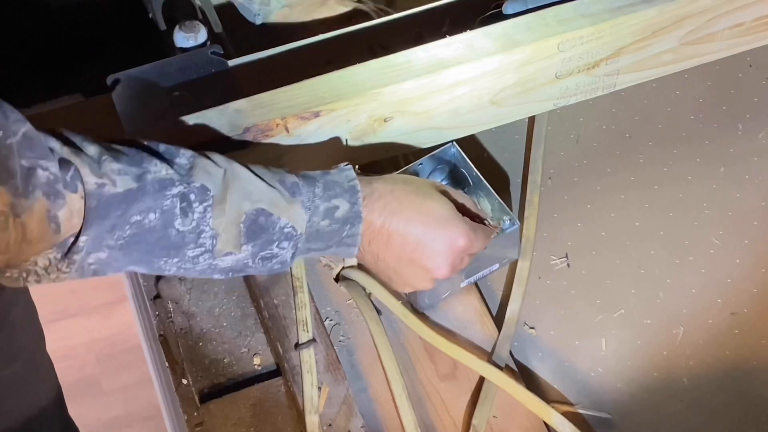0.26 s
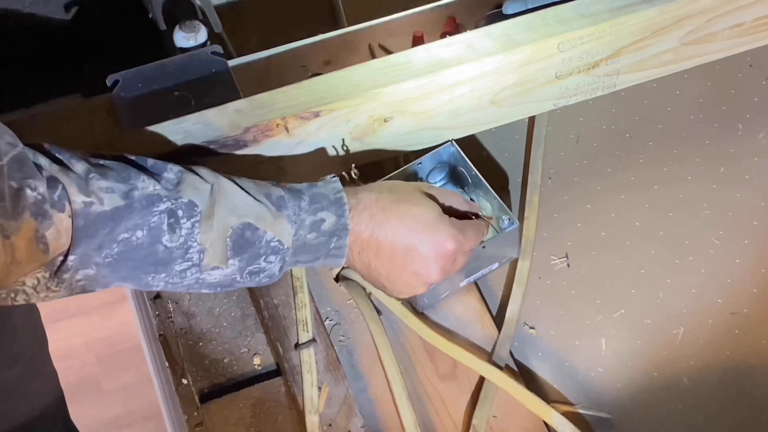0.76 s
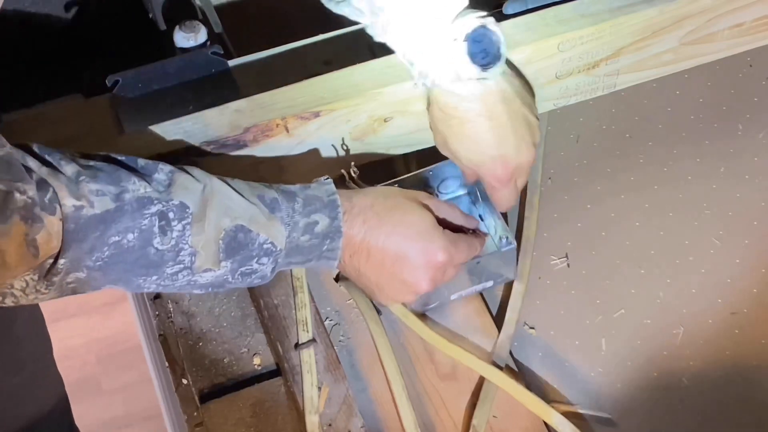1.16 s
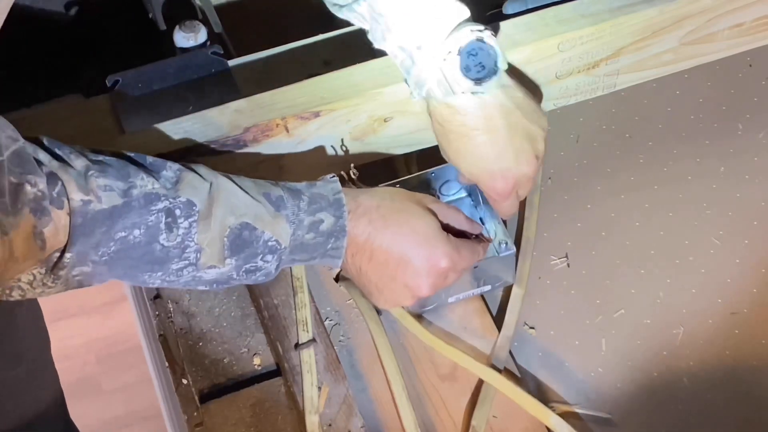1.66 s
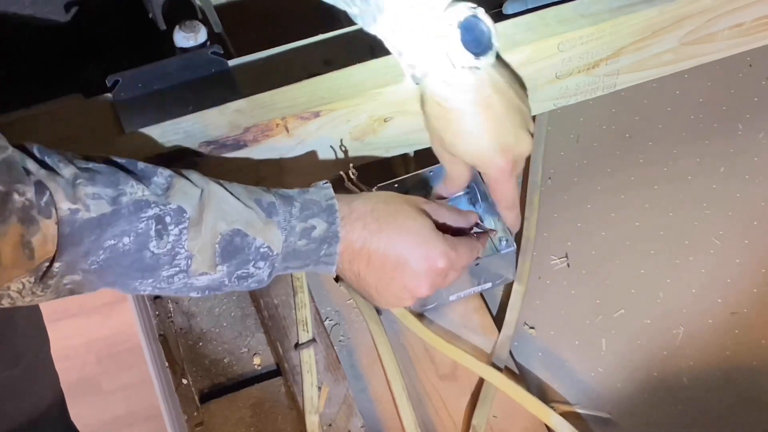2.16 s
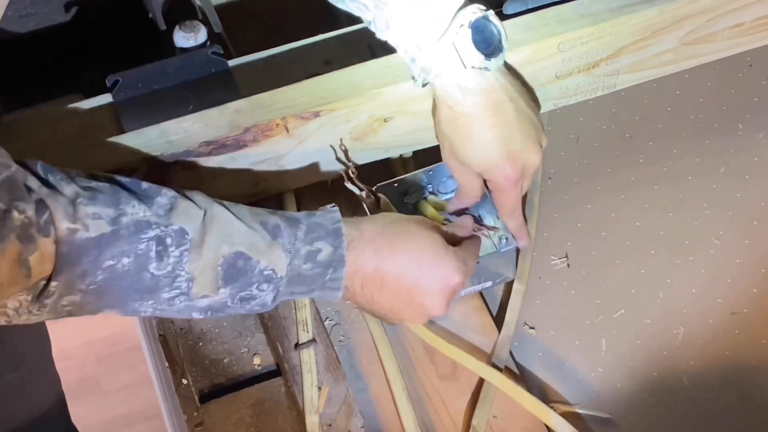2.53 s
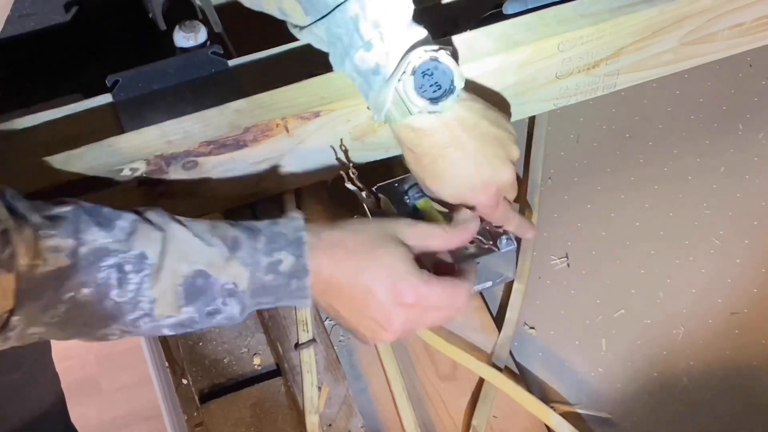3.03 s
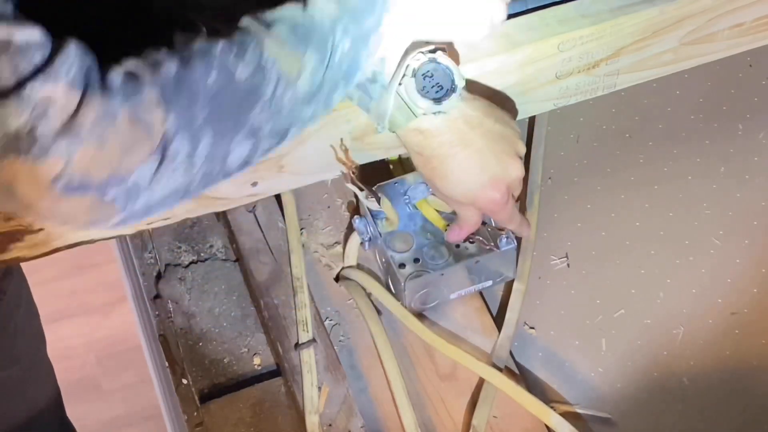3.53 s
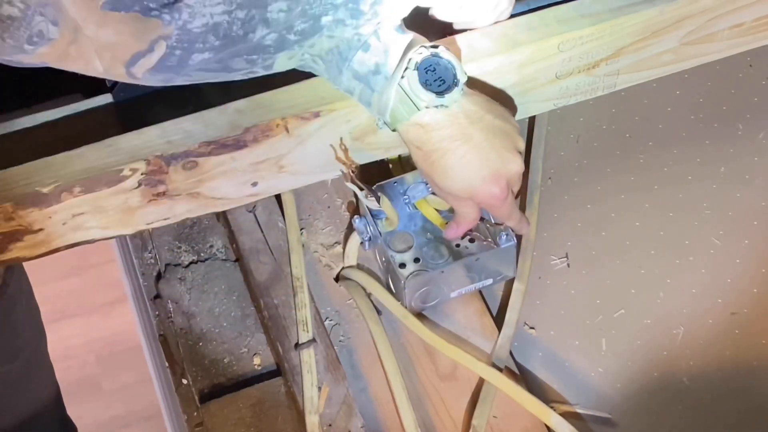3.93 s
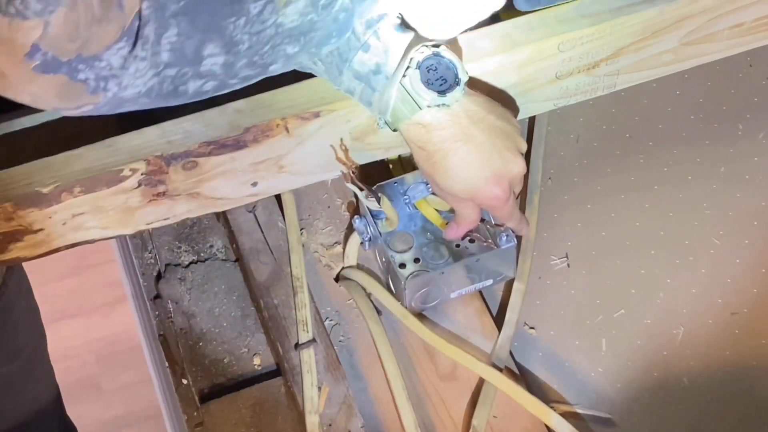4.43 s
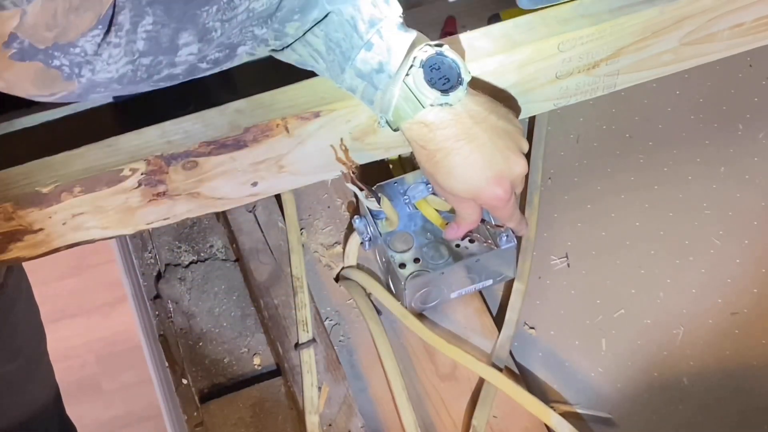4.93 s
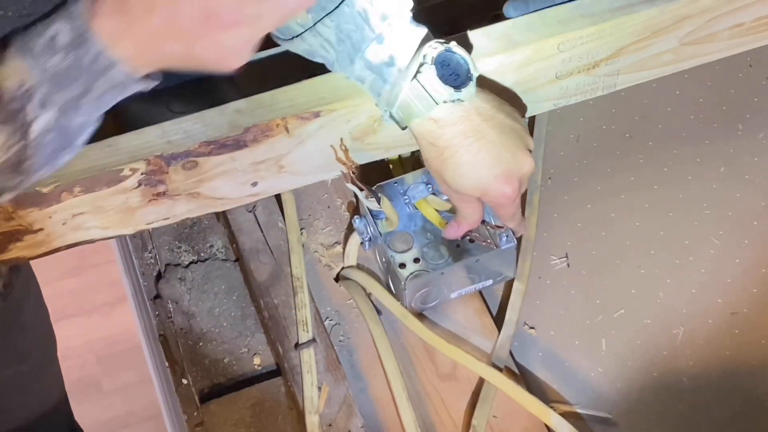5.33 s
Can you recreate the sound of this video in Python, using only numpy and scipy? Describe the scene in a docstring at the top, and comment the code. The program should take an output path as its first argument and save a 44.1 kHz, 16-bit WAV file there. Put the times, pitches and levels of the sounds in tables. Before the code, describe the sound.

Stiff sheathed cables are worked by hand in a steel electrical box, giving quiet rubs, scrapes and small metallic ticks, with a few soft thumps on a wooden board. Past the middle, a tool shifted on the boards makes louder clunks and a sharp click over hollow thuds, then a second cluster of knocks. Light ticks follow. The microphone is close, in a quiet attic.

```python
"""Stiff cables worked by hand in a steel box on an attic board; then a tool shifted on the boards.
Sheath rubs in dense slips and ticks on steel; strokes and blows ring the box modes briefly.
Soft knocks boom the board's bending mode, weight makes it rumble. Below lie room air and a sinking
hum; a faint thin tone comes and goes. A timing ripple mirrors the bass faintly around SR / 4."""
import sys
import numpy as np
from scipy import signal
from scipy.fft import rfft, irfft, next_fast_len
from scipy.io import wavfile

SR = 44100
rng = np.random.default_rng(int(sys.argv[2]) if len(sys.argv) > 2 else 0)


def unload_wav(signal):
    """Save mono or channel-first audio to the path in sys.argv[1] as 16-bit WAV at rate SR, clipped to [-1, 1]."""
    wavfile.write(
        sys.argv[1],
        SR,
        np.round(np.clip(np.atleast_2d(signal).T, -1, 1) * 32767).astype(np.int16),
    )


N = 246078

# soft knocks on the board: t/s, peak/dB, f/Hz, t60/s
KNOCKS = [(0.786, -26, 131.7, 0.2), (0.814, -26, 137.9, 0.1), (1.301, -47.5, 140.7, 0.19),
          (1.463, -31.5, 125.9, 0.082), (1.638, -35.5, 130.7, 0.16), (1.667, -44.5, 115, 0.092),
          (2.239, -47.5, 136.4, 0.36), (3.392, -42, 158, .21), (3.47, -39.5, 155, 0.29),
          (3.54, -43.5, 149.9, 0.28), (3.578, -35.5, 129.6, 0.088), (3.607, -28, 130.6, 0.17),
          (3.688, -34.5, 157.6, 0.28), (3.79, -20, 165.2, 0.27), (3.828, -20.5, 163.6, 0.097),
          (3.919, -38.5, 139.8, 0.2), (3.993, -27, 155.5, 0.28), (4.018, -23, 159.1, 0.15),
          (4.084, -36, 162.4, 0.13), (4.281, -29.5, 151.1, 0.071), (4.318, -25, 136.2, 0.12),
          (4.375, -33, 152.6, 0.28), (4.499, -35.5, 155.6, 0.37), (4.636, -28.5, 154.6, .21),
          (4.676, -28.5, 146.9, 0.58), (4.727, -23.5, 156.6, 0.16), (4.81, -42.5, 152.6, 0.23)]


def amp(db):
    """dB to gain."""
    return 10 ** (np.asarray(db) / 20)


def rms_one(x):
    """Scale to unit rms."""
    return x / np.sqrt(np.mean(x ** 2) + 1e-20)


def in_time(rows):
    """Columns after t/s as per-sample curves."""
    s, *columns = np.transpose(rows)
    return [np.interp(np.arange(N) / SR, s, c) for c in columns]


def at_hz(points, hz):
    """Read a spectrum on a log axis."""
    points_hz, db = np.transpose(points)
    return np.interp(np.log(hz), np.log(points_hz), db)


def band(x, low_hz, high_hz, order=2):
    """Butterworth band-pass."""
    return signal.sosfilt(signal.butter(order, [low_hz, high_hz], "band", fs=SR, output="sos"), x)


def noise(grain=0.):
    """Unit-rms noise; grain spreads the sample sizes, as slips of a rub do."""
    return rms_one(amp(grain * np.minimum(rng.exponential(1, N), 5)) * rng.standard_normal(N))


def drift(rate_hz):
    """Slow random curve, rms 1."""
    r = np.exp(-80 * np.pi * rate_hz / SR)
    slow = signal.lfilter([1], [1, -2 * r, r * r], rng.standard_normal(N // 40 + 2002))[2000:]
    return np.interp(np.arange(N) / 40, np.arange(len(slow)), rms_one(slow))


def resonate(x, hz, width_hz):
    """One resonance, peak gain 1."""
    r = np.exp(-np.pi * width_hz / SR)
    feedback = [1, -2 * r * np.cos(2 * np.pi * hz / SR), r * r]
    return signal.lfilter(np.array([1, 0, -1]) * (1 - r * r) / 2, feedback, x)


def body(x, modes, wander_db):
    """Parallel modes, alternating signs; the grip moves, so each swells and fades by itself."""
    return sum((-1) ** k * resonate(amp(db + wander_db * drift(4.8)) * x, hz, width_hz)
               for k, (hz, width_hz, db) in enumerate(modes))


def coloured(spectrum, flicker_db, grain=0.):
    """Half-octave noise bands, each with its own level and flicker; rms 1."""
    out, edges_hz = 0, 25 * 2 ** np.arange(0, 9.6, .5)
    white = [noise(grain), noise(grain)]
    for k, (low, high) in enumerate(zip(edges_hz, edges_hz[1:])):
        db = at_hz(spectrum, np.sqrt(low * high)) + flicker_db * drift(11.4)
        out = out + amp(db) * band(white[k % 2], low, high)
    return rms_one(out)


def decay(size, t60_s):
    """Exponential fall, 60 dB in t60_s."""
    return amp(-60 * np.arange(size) / SR / t60_s)


def ringing(hz, db, t60_s, size):
    """One struck mode dying away."""
    return amp(db) * decay(size, t60_s) * np.sin(2 * np.pi * hz * np.arange(size) / SR)


def stroke_db(full_s, rise_s, hold_s):
    """Climb to 0 dB, hold, release."""
    climb_db, release_db_per_s = 28, 210
    t = np.arange(N) / SR - full_s
    return np.minimum(0, np.minimum(climb_db * t / rise_s, release_db_per_s * (hold_s - t)))


def handling():
    """Strokes of cable and hand add in power; the loudest dominates the rub's brightness."""
    # strokes: full at t/s, rise/s, hold/s, rub/dB, brightness/dB, low box modes/dB, high box modes/dB
    strokes = [(0.0, 0.013, 0.096, -66, 4, -57.5, -60), (0.158, 0.1, 0.083, -66, 5, -59, -60.5),
               (0.668, 0.042, .0, -66.5, 3.5, -53, -80), (0.693, .02, 0.1, -76, 3, -54.5, -81),
               (0.969, 0.072, .03, -61, 3, -63.5, -76.5), (1.03, .04, 0.02, -58, 0.5, -55.5, -61),
               (1.206, .05, 0.34, -77, -3.5, -65.5, -66), (1.439, 0.024, 0.046, -76, 5, -68, -67),
               (1.538, 0.027, .0, -62, -1, -61, -55), (1.624, 0.1, 0.042, -68, 1, -60.5, -57.5),
               (1.788, 0.053, .0, -65.5, -13, -82, -57), (2.102, 0.15, 0.083, -72, 3.5, -64.5, -53.5),
               (2.251, 0.035, 0.029, -70, 2, -56.5, -60), (2.455, 0.042, 0.058, -69.5, 5, -57.5, -62),
               (2.726, 0.029, 0.065, -67, -1, -58.5, -67), (2.823, .03, 0, -58.5, 6.5, -63, -61),
               (3.303, 0.11, 0.051, -71.5, 2.5, -69, -63), (3.35, 0.017, 0.057, -72.5, 4.5, -64, -66.5),
               (3.451, 0.016, 0.05, -70, -2, -54.5, -63.5), (3.57, 0.11, 0.2, -75.5, 2.5, -62, -65.5),
               (3.676, 0.012, 0.032, -60, -10.5, -36.5, -36.5), (3.727, 0.085, 0.018, -52, 3.5, -36.5, -28),
               (3.788, 0.0045, 0.027, -53, 3, -28, -52), (3.879, 0.043, 0.091, -74.5, 7.5, -47, -62.5),
               (4.011, .03, 0.1, -82.5, 7.5, -61, -84), (4.283, 0.014, 0, -90, -7, -34.5, -82),
               (4.519, 0.092, 0.000079, -63, 2.5, -51, -48.5), (4.641, 0.039, 0.052, -74, 8, -48.5, -57),
               (4.953, 0.016, 0.058, -59, 7, -64, -56.5), (5.1, 0.0053, 0.047, -66, 5, -87, -71),
               (5.215, 0.03, .1, -77, 7.5, -84, -69), (5.58, 0.045, .0, -83, 3, -55.5, -67)]
    rest_db = np.array([[-89], [-70.5], [-77.5]])   # between strokes: rub, low, high
    power, tilt = amp(rest_db) ** 2 * np.ones(N), np.zeros(N)
    for s, rise_s, hold_s, rub_db, bright_db, low_db, high_db in strokes:
        shape_db = np.maximum(stroke_db(s, rise_s, hold_s), -200)
        part = amp(np.array([[rub_db], [low_db], [high_db]]) + shape_db) ** 2
        power += part
        tilt += bright_db * part[0]
    rub_db, low_db, high_db = 10 * np.log10(power)
    return rub_db, tilt / power[0], low_db, high_db


def box(low_db, high_db, blow):
    """Handling and blows drive the low and high box modes."""
    # modes of the box and the boards under it: f/Hz, width/Hz, level/dB
    modes = [(246.5, 19, -4), (323, 23, 3), (379.6, 18.5, 1), (432, 11, 5.5), (464.6, 25.4, 4.5),
             (557.4, 6.7, -5.5), (595, 8.8, -7), (689, 48, -5), (775.5, 9, -5), (820.3, 10, -1.5),
             (915, 57, -10.5), (1020, 36, -9), (1166, 30, -19)]
    split_hz = 650
    low = (amp(low_db) + blow) * noise(grain=2.0)
    high = (amp(high_db) + blow) * noise(grain=1.9)
    ring = body(low, [m for m in modes if m[0] < split_hz], wander_db=2.5)
    ring += body(high, [m for m in modes if m[0] >= split_hz], wander_db=3.5)
    weak_modes = amp(11) * band(low, 180, 486) + amp(-8) * band(high, 640, 830)
    clunk = amp(9) * band(blow * noise(), 430, 980, order=4)
    return amp(15.5) * ring + weak_modes + clunk


def rub(level_db, bright_db, steel_db):
    """Sheath and sleeve slide in dense slips, brightness set per stroke; scraping wakes the steel."""
    # sliding spectrum: f/Hz, density/dB
    spectrum = [(530, -30), (900, -5), (1200, -5), (1490, 2), (1970, -3), (2140, 3.5), (3300, -4.5),
                (6640, -14.5), (9420, -14), (14900, -32.5), (16000, 18)]
    # modes of steel walls and clamp: f/Hz, width/Hz, level/dB
    steel_modes = [(1440, 18, 2.5), (1927, 23, 3), (2132, 20, 2), (2420, 38, -16.5), (2560, 29, -8.5),
                   (2890, 47, -16), (3900, 310, -13.5)]
    swish = amp(level_db + drift(34)) * coloured(spectrum, flicker_db=3.5, grain=0.74)
    top = band(swish, 3500, 8100)
    steel = body(amp(steel_db) * noise(grain=5.9), steel_modes, wander_db=-0.5)
    return swish + (amp(bright_db) - 1) * top + steel


def weight_on_boards():
    """Envelope of the rumble from shifting weight."""
    # load on the boards: t/s, rumble/dB
    load = [(0.0, -59), (0.5, -70.5), (0.82, -56), (1.2, -72), (1.68, -63), (1.89, -78), (2.17, -75),
            (2.36, -62.5), (2.81, -75), (3.26, -68), (3.85, -45.5), (3.95, -49.5), (4.1, -68), (4.38, -74),
            (4.54, -52), (4.71, -49), (5.05, -72), (5.58, -73)]
    return amp(in_time(load)[0])


def rumble(weight, after_shake):
    """The boards rumble under weight and after knocks."""
    return np.hypot(weight, amp(-19) * after_shake) * rms_one(band(noise(), 50.5, 93.8, order=4))


def board(swing, weight, after_shake):
    """One bending mode, swung by knocks, gliding between their pitches, shaken in between."""
    pitch_hz = in_time(KNOCKS)[1] * (1 + .02 * drift(15))
    phase = 2 * np.pi * np.cumsum(pitch_hz) / SR
    boom = swing * (np.sin(phase) + amp(-16.5) * np.sin(2.08 * phase))
    shaking = np.hypot(amp(-7) * weight, amp(-13.5) * after_shake)
    mode_noise = resonate(resonate(noise(), 139.6, width_hz=45), 140, width_hz=130)
    return boom + shaking * rms_one(mode_noise)


def room_air():
    """Faint flickering noise, mostly bass."""
    # room spectrum: f/Hz, density/dB
    spectrum = [(15, -34), (25, 2.5), (74, 4.5), (137, 1.5), (301, -11), (463, -19), (607, -17), (911, -35),
                (1400, -40.5), (1790, -54.5), (8830, -47.5), (11000, -56), (16000, -66.5)]
    return amp(-58.5) * coloured(spectrum, flicker_db=4.5)


def hum():
    """A wavering low tone sinks and dies."""
    # glide of the hum: t/s, f/Hz, rms/dB
    glide = [(0.0, 72.9, -57.5), (.4, 69.96, -52.5), (.9, 63.27, -59.5), (1.5, 60.5, -52), (1.8, 56, -66)]
    hz, db = in_time(glide)
    fade_db = 80 * np.maximum(np.arange(N) / SR - glide[-1][0], 0)
    level = np.sqrt(2) * amp(db + 2 * drift(8) - fade_db)
    phase = 2 * np.pi * np.cumsum(hz * (1 + .02 * drift(6.9))) / SR
    return level * np.sin(phase)


def contacts():
    """Hard contacts tick and ring the wires. Returns their sound and the envelope of blows on the box."""
    # contacts: t/s, level/dB, box blow/dB, brightness/dB, wire f/Hz
    hits = [(.0211, -42, -84, -29, 3400), (.1538, -45.5, -46, -12, 2340), (.5815, -53.5, -59, -16, 3800),
            (.6632, -41, -56, -12, 2320), (.7902, -79.5, -47, -17, 2190), (.868, -59, -81, -8, 1970),
            (0.9604, -42.5, -49.5, -26, 3170), (1.4509, -45, -49, -19, 2250),
            (1.533, -41.5, -55.5, -11, 2770), (1.7434, -48.5, -58, -27, 3540),
            (1.7765, -43, -43.5, -13, 2820), (1.9871, -62.5, -51.5, -9, 2060),
            (2.069, -58, -47.5, -11, 2000), (2.0873, -44, -70, -19, 2050), (2.2025, -42.5, -67, -15, 4350),
            (2.2383, -42.5, -45, -20, 2150), (2.4494, -50, -55.5, -21, 3400), (2.4714, -49, -73, -28, 3550),
            (2.7186, -36.5, -61, -22, 2070), (2.814, -37, -71, -25, 3390), (3.3587, -49, -45, -23, 1960),
            (3.463, -52, -41.5, -18, 2020), (3.5435, -81, -41.5, -19, 1910),
            (3.6682, -28.5, -29, -16.5, 2520), (3.769, -37.5, -24, -5, 1939),
            (3.79, -17.5, -17, -13.5, 3740), (3.9902, -65.5, -38, -23, 2830),
            (4.0447, -49.5, -67, -36, 1950), (4.282, -66, -34, -3, 1900), (4.4792, -50, -55, -20, 2550),
            (4.5034, -52, -64, -15, 2380), (4.6422, -54, -46, -9, 3528),
            (4.6631, -30.5, -31.5, -16.5, 2490), (4.7083, -43, -36.5, -16, 4300),
            (4.887, -61, -69, -23, 2768), (4.9545, -37.5, -59, -41, 6490), (5.1119, -41, -69, -29, 4560),
            (5.212, -59, -72, -25, 4400), (5.24, -59, -73, -31, 2020), (5.3847, -52.5, -81, -23, 1790)]
    dull, bright, blow, rings = np.zeros((4, N + SR))
    size = SR // 2
    onset = np.minimum(np.arange(size) / (0.001 * SR), 1)   # sheath cushions the touch
    shape = onset * (decay(size, 0.0086) + amp(-14.5) * decay(size, 0.14))   # crack, then chatter
    for s, db, box_db, bright_db, hz in hits:
        i = round(s * SR)
        dull[i:i + size] += amp(db) * shape
        bright[i:i + size] += amp(db + bright_db) * shape
        blow[i:i + size] += amp(box_db) * (decay(size, 0.0041) + amp(-7.5) * decay(size, 0.07))
        rings[i:i + size] += ringing(hz, db - 16, 0.041, size)
    ticks = amp(-2.5) * band(dull[:N] * noise(grain=3.2), 1700, 6000)
    ticks += band(bright[:N] * noise(grain=1.8), 4500, 21000)
    return ticks + rings[:N], blow[:N]


def thin_tone():
    """Faint narrow-band noise comes and goes."""
    # swells of the tone: full at t/s, rise/s, hold/s, level/dB
    swells = [(.36, .05, 0.11, -83.5), (5.31, 0.039, 0.012, -76.5), (5.53, 0.09, 0.018, -79)]
    level = sum(amp(db + stroke_db(s, rise_s, hold_s)) for s, rise_s, hold_s, db in swells)
    return level * rms_one(resonate(noise(), hz=1770, width_hz=59))


def knocks():
    """Envelopes of the board's swing and its slower after-shake; knocks add in power."""
    rise_s, after_t60_s = 0.017, 0.62
    swing, after = np.zeros((2, N + SR))
    t = np.arange(SR) / SR
    swell = np.sin(np.pi / 2 * np.minimum(t / rise_s, 1)) ** 2
    for s, db, _, t60_s in KNOCKS:
        i = round(s * SR)
        swing[i:i + SR] += (amp(db - 60 * np.maximum(t - rise_s, 0) / t60_s) * swell) ** 2
        after[i:i + SR] += (amp(db) * swell * decay(SR, after_t60_s)) ** 2
    return np.sqrt(swing[:N]), np.sqrt(after[:N])


def clink(at_s):
    """A loose steel part rings once."""
    # modes of the part: f/Hz, level/dB, t60/s
    modes = [(1400, -56.5, 0.1), (2640, -62, 0.11), (4302, -60, 0.088), (2100, -79, .06), (5760, -81, .12),
             (5530, -65, 0.14), (7900, -59, .06), (8300, -68, .06)]
    i = round(at_s * SR)
    ring = sum(ringing(hz, db, t60_s, N - i) for hz, db, t60_s in modes)
    return np.pad(ring, (i, 0))


def stereo_ports(mid):
    """Two close ports: the side signal is a quarter turn in the bass, scattered reflections higher up."""
    # stereo width: f/Hz, side re mid/dB
    width = [(60, -32.5), (110, -13), (200, -10.5), (380, -8), (700, -6), (1290, -1.5), (2380, -11),
             (4400, -44.5), (8120, -6), (15000, -16.5)]
    size = next_fast_len(N + SR // 10)
    hz = np.maximum(np.arange(size // 2 + 1) * SR / size, 1)
    reflections = rms_one(decay(4000, .12) * rng.standard_normal(4000)) / np.sqrt(4000)
    scattered = 1 / (1 + (500 / hz) ** 2)
    response = 1j * (1 - scattered) + scattered * rfft(reflections, size)
    side = irfft(rfft(mid, size) * amp(at_hz(width, hz)) * response, size)[:N]
    return mid + side * [[1], [-1]]


def scene():
    """Cables, box and boards over the room background, in stereo."""
    rub_db, bright_db, low_db, high_db = handling()
    weight = weight_on_boards()
    swing, after_shake = knocks()
    ticks, blow = contacts()
    background = rumble(weight, after_shake) + thin_tone() + room_air()
    hands = box(low_db, high_db, blow) + rub(rub_db, bright_db, high_db) + ticks + clink(at_s=1.538)
    return stereo_ports(hands + board(swing, weight, after_shake) + background + hum())


def record(dry):
    """A four-sample timing ripple mirrors the slope of the bass around SR / 4; the top is cut."""
    bass_hz, cutoff_hz = 1200, 16500
    bass = signal.sosfilt(signal.butter(4, bass_hz, fs=SR, output="sos"), dry)
    ripple = amp(0.5) * np.cos(np.pi / 2 * np.arange(N) + np.pi / 8)
    mirror = np.gradient(bass, axis=1) * ripple
    return signal.sosfilt(signal.cheby2(12, 70, cutoff_hz, fs=SR, output="sos"), dry + mirror)


dry = scene()
out = record(dry)
unload_wav(out)
```